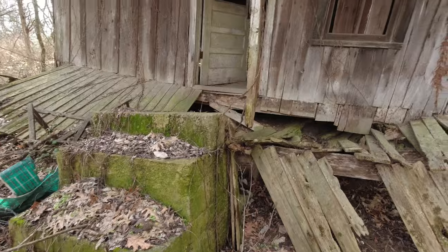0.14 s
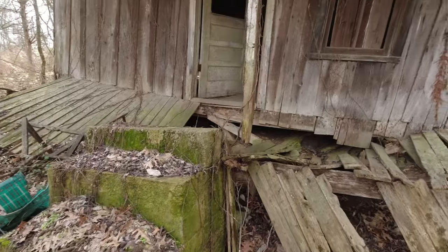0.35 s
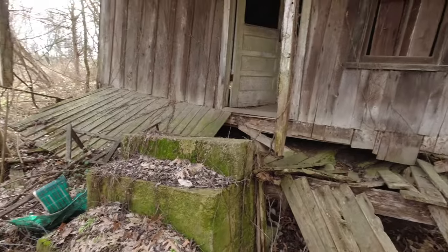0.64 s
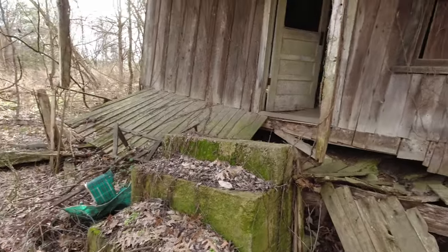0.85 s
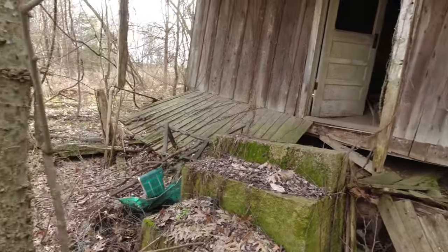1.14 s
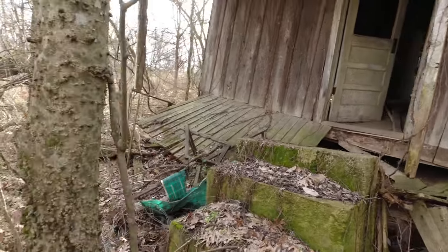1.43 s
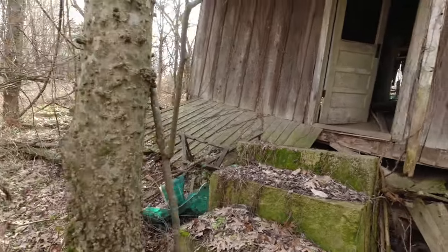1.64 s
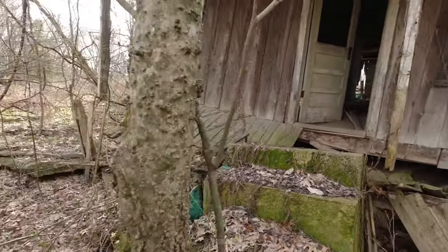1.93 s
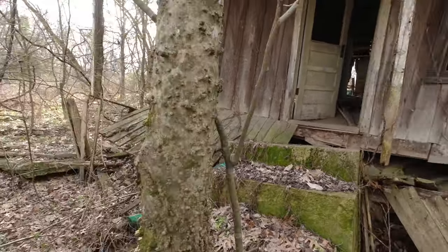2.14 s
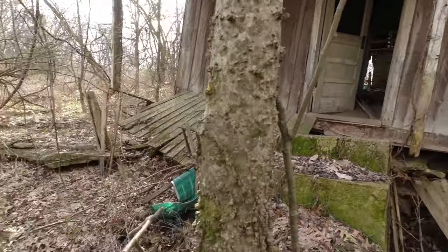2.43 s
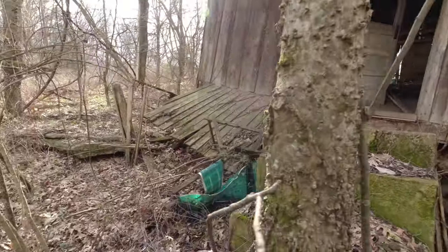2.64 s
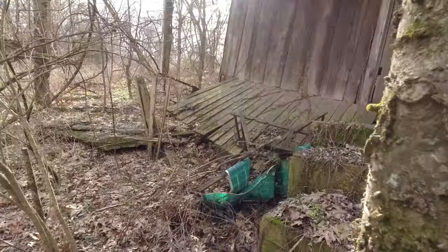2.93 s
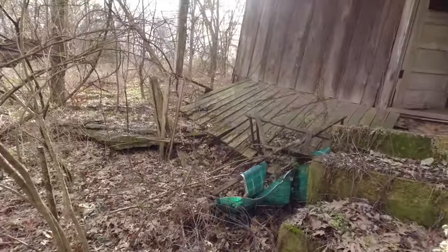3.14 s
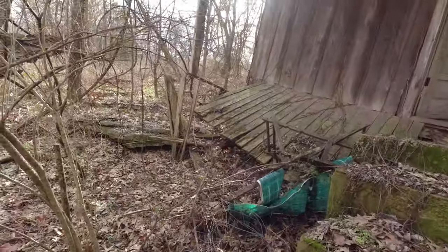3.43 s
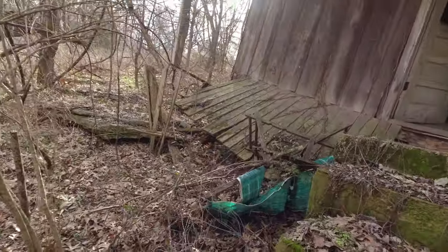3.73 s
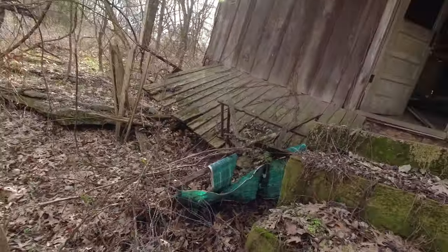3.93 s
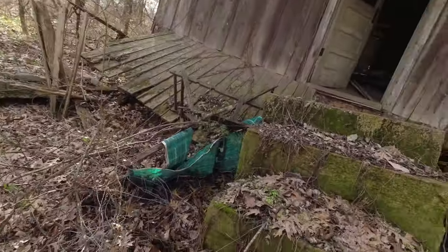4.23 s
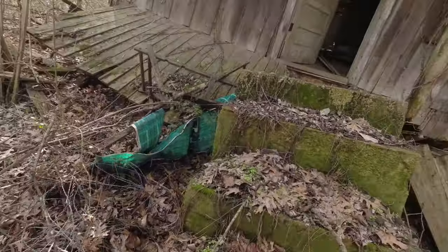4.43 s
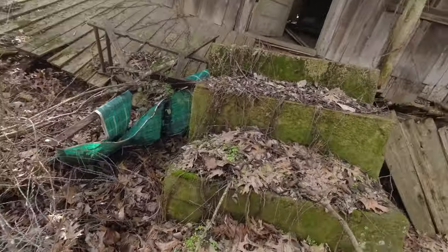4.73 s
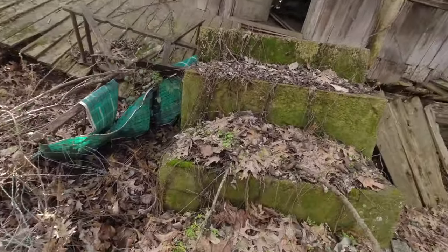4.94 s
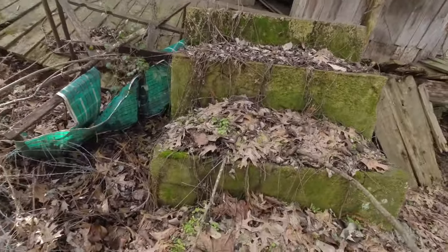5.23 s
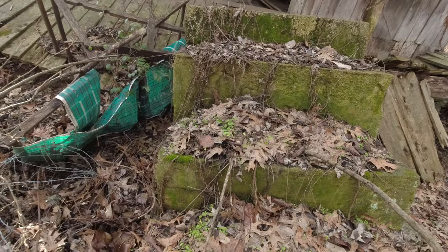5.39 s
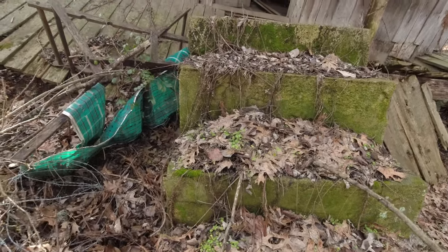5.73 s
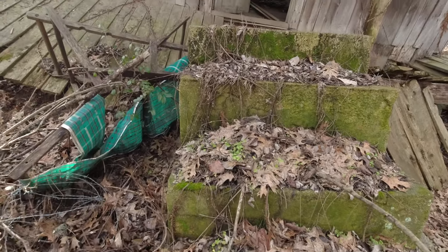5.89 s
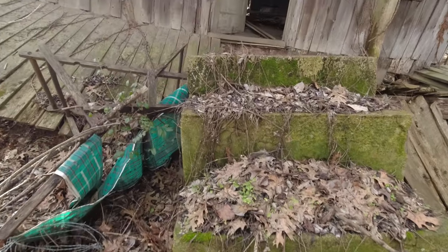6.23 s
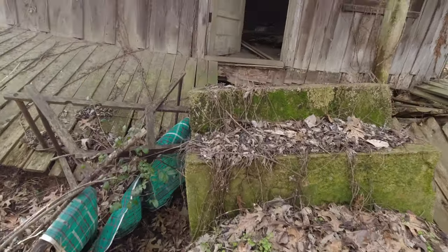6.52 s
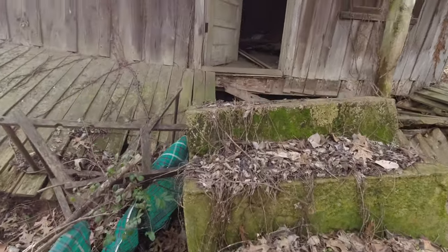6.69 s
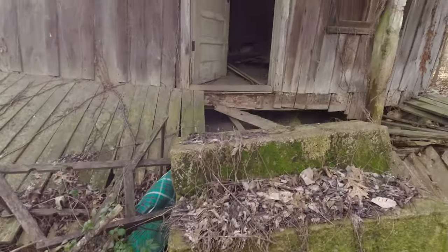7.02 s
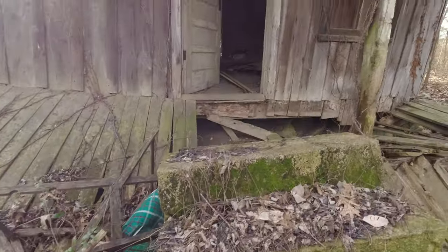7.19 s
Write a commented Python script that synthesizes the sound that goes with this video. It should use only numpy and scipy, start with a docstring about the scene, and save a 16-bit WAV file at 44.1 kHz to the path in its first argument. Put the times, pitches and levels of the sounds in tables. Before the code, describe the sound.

Slow, uneven footsteps crush dry leaves in a wood, close to the microphone, with small twigs snapping sharply underfoot throughout. A distant engine drones low in the background, stronger in the first half, and soft puffs of air rumble on the microphone. Near the middle the microphone is bumped and brushed, then again about a second later. The steps grow lighter toward the end.

```python
"""Slow footsteps crush dry leaves in a wood, and twigs snap underfoot.
Both are brittle fracture: each press of a foot releases a swell of tiny cracks, and each
breaking twig excites a resonance of the stick. The walker's camera is knocked and brushed,
and eddies buffet its microphone. Behind it all a far engine drones in a soft wash of noise."""
import sys
import numpy as np
from scipy import signal
from scipy.fft import rfft, irfft
from scipy.io import wavfile
from scipy.ndimage import uniform_filter1d

SR = 44100
rng = np.random.default_rng(int(sys.argv[2]) if len(sys.argv) > 2 else 0)


def dump_mix(stems):
    """Bounce the given channels to the path in sys.argv[1] as a 16-bit WAV at rate SR."""
    frames = np.atleast_2d(stems).T  # one column per channel
    limited = np.clip(frames, -1, 1)  # hard clip at full scale
    pcm = np.round(limited * 32767).astype(np.int16)
    wavfile.write(sys.argv[1], SR, pcm)


N = 324135
TIME = np.arange(N) / SR

# Presses of a foot as it lands, rolls and lifts. Litter and sparkle are relative to top, soil to litter.
# peak_s, rise_s, fall_s, top_db, litter_db, soil_db, sparkle_db
PRESSES = [(0.0, .05, 0.13, -49.5, -7, 5.5, 2.5), (.2, 0.11, 0.26, -53.5, -8.5, 8, -6),
           (.48, .02, 0.045, -56.5, 0.5, 8, -3), (.72, 0.21, 0.13, -56, -1.5, 10, 1.5),
           (1.36, 0.023, 0.15, -63, -2.5, 14.5, -20), (1.499, 0.023, .06, -42, -3.5, 4.5, -2.5),
           (1.6, .05, 0.097, -52.5, 5, 3.5, 4), (1.81, 0.04, 0.08, -51, 3, -3.5, -2),
           (1.95, 0.066, 0.044, -35.5, -4, -0.5, 1.5), (2.21, 0.074, 0.15, -66, -15, -3, -10),
           (2.662, 0.031, 0.049, -38, -1.5, -0.5, -1.5), (2.72, 0.025, 0.062, -42.5, -1.5, 4, 3),
           (2.84, .08, 0.14, -55, -1.5, -3, 1.5), (2.955, 0.038, .025, -41, -6.5, -4, -1),
           (3.13, 0.23, 0.12, -59.5, -6, 2, -3), (3.28, 0.083, 0.051, -54, 2, -1.5, 4),
           (3.401, 0.088, 0.1, -57, -2.5, 2.5, -0.5), (3.68, 0.11, 0.11, -64, -4, -5, -6),
           (3.857, 0.013, .03, -51, -6.5, 0, -5), (3.98, 0.04, 0.046, -50.5, 1, 1.5, 5.5),
           (4.22, 0.24, 0.34, -63, -1.5, 6.5, 1.5), (4.509, 0.026, 0.13, -52.5, 2.5, -13, 5.5),
           (4.74, 0.08, 0.22, -62, -1, -9, 9.5), (4.905, 0.064, 0.069, -51.5, -5.5, -2, -2.5),
           (4.99, 0.016, 0.058, -49.5, 4.5, 0, 3), (5.16, 0.17, 0.082, -52, -2.5, -4, 0.5),
           (5.33, 0.15, 0.14, -59, -1, -19, 3.5), (5.455, 0.039, 0.049, -50.5, -4, 2, 1.5),
           (5.55, 0.049, .08, -45.5, -4.5, -4.5, -0.5), (5.755, 0.024, 0.042, -58, -3.5, -2, 4),
           (5.84, .015, .045, -55.5, -1.5, -8, 1.5), (5.902, 0.011, 0.017, -68, 5, 13.5, -4),
           (6.13, .1, .15, -75, -9.5, 7, -11), (6.312, 0.015, 0.065, -48.5, -4.5, 3, -30),
           (6.368, 0.035, 0.065, -45.5, -5.5, 6, -6), (6.78, 0.12, 0.11, -59.5, 1, -2.5, -35),
           (7.028, 0.046, 0.05, -53.5, 2, 1, -17), (7.32, 0.024, 0.033, -72, 9, -4, -15)]


def gain_of(db):
    """Amplitude ratio of a level in decibels."""
    return 10 ** (np.asarray(db) / 20)


def unit_rms(x):
    """Normalisation to a mean power of 1."""
    return x / np.sqrt(np.mean(x ** 2) + 1e-20)


def add(mix, start_s, sound):
    """Superposition: a sound joins the mix at its start time."""
    part = mix[max(round(start_s * SR), 0):][:len(sound)]
    part += sound[:len(part)]


def coloured(x, spectrum):
    """Spectral shaping by (frequency_hz, gain_db) points, rolling off beyond both ends; rms 1."""
    hz, db = np.transpose(spectrum)
    f = np.fft.rfftfreq(len(x), 1 / SR)
    shape = gain_of(np.interp(np.log(f + 1), np.log(hz + 1), db))
    roll_off = np.minimum(f / hz[0], 1) ** 2 / np.maximum(f / hz[-1], 1) ** 2
    return unit_rms(irfft(rfft(x) * shape * roll_off, len(x)))


def noise(spectrum):
    """Gaussian noise shaped to a spectrum, at rms 1."""
    return coloured(rng.standard_normal(N), spectrum)


def wander(rate_hz, points=4096):
    """Slow random modulation: noise low-passed near rate_hz, at rms 1."""
    t = np.linspace(0, N / SR, points)
    low_pass = np.exp(-(np.fft.rfftfreq(points, t[1]) / rate_hz) ** 2)
    drift = irfft(rfft(rng.standard_normal(points)) * low_pass)
    return np.interp(TIME, t, unit_rms(drift))


def band(x, low_hz, high_hz, order=2):
    """Causal band-pass filter."""
    return signal.sosfilt(signal.butter(order, [low_hz, high_hz], "band", fs=SR, output="sos"), x)


def ringing(x, hz, q, ring_db):
    """Forced resonance: the excitation plus the response of one mode."""
    return x + gain_of(ring_db) * signal.lfilter(*signal.iirpeak(hz, q, SR), x)


def swell(peak_s, rise_s, fall_s):
    """Near-exponential growth and decay in dB, 8.5 down at one rise or fall time from the peak."""
    widths = np.maximum((peak_s - TIME) / rise_s, (TIME - peak_s) / fall_s)
    return -8.5 * np.minimum(widths, 20) ** 1.13


def hum(pitch_hz, waver_hz, waver_db):
    """A far tone under slow random frequency and amplitude modulation."""
    cycles = np.cumsum(pitch_hz + waver_hz * wander(2.47)) / SR
    return np.sqrt(2) * np.sin(2 * np.pi * cycles) * gain_of(waver_db * wander(9.4))


def far_ambience():
    """Superposed distant sources: steady and swelling hums in a low wash, with faint hiss above."""
    # Hums that follow the level of the wash: pitch_hz, relative_db
    wash_hums = [(90, -7), (149.5, -7), (224, -17.5)]
    # Hums that swell and fade: peak_s, rise_s, fall_s, level_db, pitch_hz
    hum_swells = [(.35, .35, 0.39, -60.5, 261.7), (2.6, 1.05, 1, -55.5, 121), (3.5, 0.13, .2, -63, 200),
                  (5.75, 0.17, 0.13, -58, 121), (6.5, 0.22, 0.11, -54.5, 119.1),
                  (7.32, 0.16, .2, -63.5, 220.6)]
    # Contour of the wash and its hums: time_s, relative_db
    wash_levels = [(0, -53), (1.5, -57.5), (2.0, -59), (2.9, -57), (3.6, -62.5), (5.0, -61.5), (5.9, -66.5),
                   (7.35, -63.5)]
    # Spectra of the wash and the hiss: frequency_hz, density_db
    wash_spectrum = [(20, 5.5), (45, -5.5), (80, 1), (130, 0), (200, -6), (330, -9.5), (550, -11),
                     (800, -8), (1200, -11.5), (2000, -20), (3200, -36), (6000, -69)]
    hiss_spectrum = [(800, -29), (2000, 0), (4000, -5.5), (6500, -7), (9000, -14), (12000, -24.5),
                     (14000, -27), (16000, -33.5)]
    steady = gain_of(-65.5) * hum(121, waver_hz=0.41, waver_db=2)
    hums = sum(gain_of(db) * hum(hz, waver_hz=0.745, waver_db=1) for hz, db in wash_hums)
    swelling = sum(gain_of(db + swell(peak_s, rise_s, fall_s)) * hum(hz, waver_hz=2.59, waver_db=2)
                   for peak_s, rise_s, fall_s, db, hz in hum_swells)
    wash = gain_of(3 + 0.28 * wander(2.2)) * noise(wash_spectrum)
    contour = gain_of(np.interp(TIME, *np.transpose(wash_levels)))
    hiss = gain_of(-70.5) * noise(hiss_spectrum)
    return steady + swelling + contour * (wash + hums) + hiss


def far_engine():
    """Periodic firing radiates a low tone at the firing rate."""
    # Contour of the firing tone: time_s, level_db
    drone_levels = [(0, -46.5), (.6, -54), (1.1, -49), (1.7, -42), (2.3, -49), (2.8, -42.5), (3.35, -57),
                    (3.9, -49.5), (4.6, -66), (5.1, -56), (5.5, -65.5), (7.35, -65)]
    contour = gain_of(np.interp(TIME, *np.transpose(drone_levels)))
    return contour * hum(pitch_hz=74, waver_hz=0.21, waver_db=1.9)


def buffeting():
    """Turbulence: eddies make slow pressure fluctuations at the microphone as the camera swings."""
    # Eddies: peak_s, rise_s, fall_s, relative_db
    gusts = [(.13, 0.083, 0.052, -38.5), (.5, .03, .05, -48), (1.42, 0.057, 0.16, -34),
             (1.92, 0.1, .09, -35), (2.57, 0.033, 0.11, -28.5), (3.28, 0.13, 0.19, -38),
             (5.15, 0.032, 0.036, -37.5), (6.85, .04, 0.053, -48.5)]
    # Spectrum of the turbulent pressure: frequency_hz, density_db
    eddy_spectrum = [(7, 26), (12, 9), (26, 12.5), (42, -5.5), (65, -12), (120, -28), (300, -24),
                     (800, -54)]
    calm = gain_of(-67.5)
    eddies = sum(gain_of(db + swell(peak_s, rise_s, fall_s)) for peak_s, rise_s, fall_s, db in gusts)
    return gain_of(7) * (calm + eddies) * noise(eddy_spectrum)


def camera_knocks():
    """An impact pushes the microphone with one pulse and excites the damped modes of the casing."""
    # Bumps on the camera: start_s, push_db, push_s, ring_db
    knocks = [(0.472, -33.5, 0.031, -39), (3.0556, -34, 0.0028, -49), (3.0679, -40, 0.011, -16.5),
              (3.073, -35, 0.0016, -17.5), (3.1039, -11.5, 0.0088, -29), (4.2456, -22, 0.0042, -33),
              (4.259, -33.5, 0.02, -36)]
    # Modes of the casing: pitch_hz, relative_db, t60_s
    modes = [(172, -2.5, 0.12), (144.7, -12, 0.21), (304, -18, 0.048), (636, -38, 0.031)]
    out, t = np.zeros(N), np.arange(SR // 4) / SR
    ring = sum(gain_of(db - 60 * t / t60_s) * np.sin(2 * np.pi * hz * t) for hz, db, t60_s in modes)
    for start_s, push_db, push_s, ring_db in knocks:
        push = np.sin(np.pi * np.minimum(t / push_s, 1)) ** 2
        add(out, start_s, gain_of(ring_db) * ring - gain_of(push_db) * push)
    return out


def camera_brushes():
    """Friction on the casing drives a hollow resonance; a lighter contact is duller."""
    # Sliding contacts: start_s, length_s, level_db, tone_hz
    brushes = [(2.645, 0.043, -44.5, 384), (3.026, 0.03, -40.5, 610), (3.051, 0.036, -25.5, 680),
               (3.101, 0.01026, -29, 746), (3.118, .022, -42.5, 450), (3.135, 0.035, -37.5, 427),
               (4.241, 0.01125, -29.5, 493), (4.249, 0.063, -44.5, 500), (4.957, 0.039, -48.5, 375)]
    # Spectrum of the friction: frequency_hz, density_db
    friction_spectrum = [(60, 3), (160, 11.5), (240, -0.5), (330, 0.5), (700, -6.5), (1100, -14.5),
                         (1600, -15), (2500, -29), (6000, -24), (12000, -34)]
    firm_edge_hz, firm_db, db_per_octave = 4900, -23.5, 9.5
    out = np.zeros(N)
    for start_s, length_s, level_db, tone_hz in brushes:
        friction = coloured(rng.standard_normal(SR // 4), friction_spectrum)
        hollow = ringing(friction, tone_hz, q=4, ring_db=0)
        edge_hz = firm_edge_hz * 2 ** ((level_db - firm_db) / db_per_octave)
        scrape = band(hollow, 29, max(edge_hz, tone_hz), order=1)[-round(length_s * SR):]
        add(out, start_s, gain_of(level_db) * unit_rms(scrape) * signal.windows.tukey(len(scrape), 0.5))
    return out


def scatter(x, near_t60_s=0.095, far_db=-15, far_t60_s=0.45):
    """Scattering from ground and trunks returns a short, thin reverberant tail."""
    t = np.arange(SR // 2) / SR
    onset = 1 - np.exp(-t / 0.001)
    fade = gain_of(-60 * t / near_t60_s) + gain_of(far_db - 60 * t / far_t60_s)
    tail = band(rng.standard_normal(len(t)), 280, 8700, order=1) * fade * onset
    return signal.fftconvolve(x, tail / np.linalg.norm(tail))[:N]


def twigs():
    """Fracture: tearing fibres excite the stick's resonance, and thick wood outlasts splinters."""
    # Breaking twigs and leaf stems: start_s, body_db, crack_db, splinter_db, base_decay_ms, ring_hz
    snaps = [(0.1073, -53, -50, -41, 0.84, 7220.0), (0.237, -39.5, -42, -44, 1.3, 1070.0),
             (0.278, -69, -38.5, -41, 1.2, 3220), (0.471, -34, -39, -37.5, 2, 960),
             (0.4587, -63, -56, -51, 1.6, 1030), (0.563, -43.5, -54, -43, 1.4, 7260.0),
             (0.6522, -62, -56, -43.5, 1.1, 6000), (0.7067, -37, -38, -45, 0.43, 1020),
             (0.7324, -61, -43.5, -46, 2.2, 6500), (1.349, -58, -40.5, -49.5, 2.2, 5300),
             (1.5023, -40.5, -38, -39, 3.3, 6460), (1.5103, -54, -50, -37, 1, 7390.0),
             (1.5667, -64, -47, -37, 1.5, 6950), (1.5954, -47, -58, -50, 0.82, 1460.0),
             (1.6553, -38, -34.5, -32, 1.4, 4300), (1.7839, -44, -36, -46.5, 1.4, 2530),
             (1.8504, -60, -43, -41, 1.2, 5600), (1.9778, -44, -45.0, -35.5, 3.9, 7000),
             (2.398, -72, -59.5, -66, 4.6, 3800), (2.6439, -42.5, -36.0, -41, 5, 2800),
             (2.7331, -29.5, -33.5, -33.5, 1.5, 850), (2.7441, -61, -31, -49, 0.5, 2700),
             (2.7507, -43, -38, -50, 1.5, 2770), (2.802, -50, -42, -46, 1.1, 3750.0),
             (2.8602, -67, -49, -46.5, 0.82, 7460.0), (2.929, -54, -41, -36.5, 1.4, 5270),
             (2.9573, -63, -62, -43, 2.6, 6890.0), (3.3618, -47.5, -51, -61, 2.6, 965),
             (3.3828, -49, -43, -55, 2.1, 2690), (3.8477, -79, -45.5, -39.5, 7.7, 4060),
             (4.0737, -35, -48, -56, 1.4, 896), (4.111, -62, -51, -54.5, 1.5, 4520),
             (4.2402, -36.5, -38, -30.5, 2.9, 3140), (4.243, -32.5, -28.5, -32, 3.2, 3170),
             (4.2615, -36.5, -35, -49.0, 4.2, 2340), (4.4743, -67, -38.5, -40.5, 13, 5540),
             (4.481, -52, -32.5, -37, 9.9, 2900), (4.5534, -59, -44, -67, 4, 3470),
             (4.631, -65, -52, -48.5, 2.4, 4240), (4.6805, -57.5, -56, -45, 1.3, 755),
             (4.7435, -63.5, -58, -45.5, 1.4, 8900), (4.8052, -59, -57, -51, 1.5, 8600),
             (4.8515, -66, -61, -50, 1, 6350), (4.9315, -52.5, -43.5, -45.0, 1.1, 2370.0),
             (4.9512, -64, -29, -26.5, 1.1, 2670), (4.9533, -34.5, -35, -34.5, 6.8, 976),
             (5.0078, -65, -51, -49, 0.77, 3770), (5.1325, -51, -40.5, -48, 1.2, 4740),
             (5.172, -58, -46.0, -64, 2.4, 3020), (5.261, -63, -54, -51, 0.86, 6340),
             (5.3716, -70, -51.5, -47, 2.2, 7700), (5.4084, -71, -50, -46, 4.4, 7100),
             (5.4451, -37, -36.5, -49, 2.7, 1470), (5.4511, -59, -50, -46, 0.86, 1340),
             (5.6939, -64, -49.0, -49, 8.3, 4600), (5.8316, -74, -45, -51.5, 8.0, 4300),
             (6.062, -64, -65, -73, 1.1, 2400), (6.3021, -50, -51, -66, 4, 1050),
             (6.315, -59, -52, -65, 7.1, 1020)]
    out, t = np.zeros(N), np.arange(SR // 12) / SR
    attack = t < 0.005
    press_s, *_, sparkle_db = np.transpose(PRESSES)
    for start_s, body_db, crack_db, splinter_db, base_decay_ms, ring_hz in snaps:
        decay_s = base_decay_ms / 1000
        onset = 1 - np.exp(-t / (0.057 * decay_s))  # slow breaks also start slowly
        fibres = rng.standard_normal(len(t)) * onset
        q = 1 + 3.5 * np.sqrt(base_decay_ms)  # long sticks ring more purely
        thick, thin, tear = (ringing(fibres * np.exp(-t / (stretch * decay_s)), ring_hz, q, ring_db=10)
                             for stretch in (1.3, 1, 0.9))
        body = band(thick, 660, 1480) + band(thick, 333, 486)
        crack = band(thin, 2050, 4900, order=3)
        brightness = gain_of(np.interp(start_s, press_s, sparkle_db) - 11)  # follows nearby crunches
        splinter = band(tear, 5890, 8100, order=3) + brightness * band(tear, 6630, 13500, order=3)
        for part, db in ((body, body_db), (crack, crack_db), (splinter, splinter_db)):
            attack_rms = np.sqrt(np.mean(part[attack] ** 2))
            add(out, start_s, gain_of(db) * part / attack_rms)
    return out


def tread():
    """Incoherent presses add in power, giving envelopes for top leaves, sparkle, litter and soil."""
    settle_db, settle_db_per_s = -15, 79  # trodden leaves spring back after each press
    power = np.zeros((4, N))
    for peak_s, rise_s, fall_s, top_db, litter_db, soil_db, sparkle_db in PRESSES:
        press_db = swell(peak_s, rise_s, fall_s)
        rebound_db = settle_db + np.where(TIME < peak_s, press_db, -settle_db_per_s * (TIME - peak_s))
        weight_db = np.maximum(press_db, rebound_db)
        top = gain_of(top_db + weight_db)
        # the highest treble swells and fades faster than the rest of the crunch
        sparkle = gain_of(top_db + sparkle_db + 1.25 * weight_db)
        litter = top * gain_of(litter_db)
        soil = litter * gain_of(soil_db)
        power += np.square([top, sparkle, litter, soil])
    return np.sqrt(power)


def crackle(per_s, spread_db, decay_s, kinds=10):
    """Shot noise: tiny fractures of uneven size at random times, each kind with its own short ring."""
    t = np.arange(SR // 200) / SR
    sizes = gain_of(spread_db * np.minimum(rng.exponential(1, N), 4))
    impulses = sizes * (rng.random(N) < per_s / SR)
    kind = rng.integers(0, kinds, N)
    rings = rng.standard_normal((kinds, len(t))) * np.exp(-t / decay_s)
    cracks = sum(signal.oaconvolve(impulses * (kind == k), unit_rms(rings[k]))[:N] for k in range(kinds))
    return unit_rms(cracks)


def patchy(x, depth_db=2.5):
    """Spectral modulation: random patches of the spectrum swell and fade, so the colour shifts."""
    spectrogram = signal.stft(x, nperseg=256, noverlap=192)[2]
    patches = uniform_filter1d(rng.standard_normal(spectrogram.shape), 5, axis=0)  # across frequency
    patches = uniform_filter1d(patches, 14, axis=1)  # across time
    spectrogram *= gain_of(depth_db * unit_rms(patches))
    return unit_rms(signal.istft(spectrogram, nperseg=256, noverlap=192)[1][:N])


def leaves():
    """Brittle fracture under load: the foot breaks crisp leaves, packed litter and damp soil crumbs."""
    # Spectra of the top leaves, their highest crackle, the litter and the soil: frequency_hz, gain_db
    top_spectrum = [(1500, -21.5), (3500, -8.5), (5000, -4), (7000, 5), (8200, -3), (9500, -19),
                    (11000, -36.5)]
    sparkle_spectrum = [(7500, -4.5), (9300, -1), (11000, -4), (13000, -5), (14500, -12.5), (16000, -19)]
    litter_spectrum = [(400, -15), (1000, -19.5), (1600, -0.5), (2900, -0.5), (4200, -3.5), (6000, -6.5),
                       (10000, -91)]
    soil_spectrum = [(100, -25), (240, -18), (380, -7.5), (560, -2.5), (900, 1.5), (1300, -2.5),
                     (2000, -18.5), (4000, -42)]
    top, sparkle, litter, soil = tread()
    cracks = crackle(per_s=2600, spread_db=3.5, decay_s=0.0018)
    merging = np.maximum(top / gain_of(-55.5), 1)  # single ticks stand out only under a light tread
    ticks = gain_of(-6) / merging * crackle(per_s=36, spread_db=0.7, decay_s=0.00086)
    fizz = gain_of(-3.5) * rng.standard_normal(N)  # leaves sliding over each other
    clumps = gain_of(1.32 * wander(33.6))  # they give way in groups
    crunch = patchy((cracks + ticks + fizz) * clumps)
    return (gain_of(-3) * top * coloured(crunch, top_spectrum)
            + gain_of(-8) * sparkle * coloured(crunch, sparkle_spectrum)
            + gain_of(-0.5) * litter * coloured(crunch, litter_spectrum)
            + gain_of(-5) * soil * coloured(crunch, soil_spectrum))


def scene():
    """Superposition at one microphone: close steps, camera noises and the far background."""
    snaps = twigs()
    steps = leaves() + snaps + gain_of(-14) * scatter(snaps)
    camera = camera_knocks() + camera_brushes() + buffeting()
    return (steps + camera + far_engine() + far_ambience())[None]


def record(dry):
    """Band limiting: a linear-phase low-pass removes the highest treble."""
    low_pass = signal.firwin(401, cutoff=16200, window=("kaiser", 8), fs=SR)
    return signal.oaconvolve(dry, low_pass[None], "same")


dry = scene()
out = record(dry)
dump_mix(out)
```